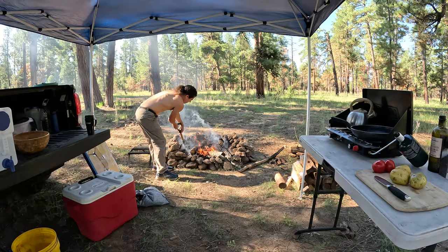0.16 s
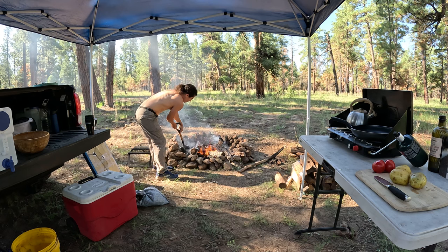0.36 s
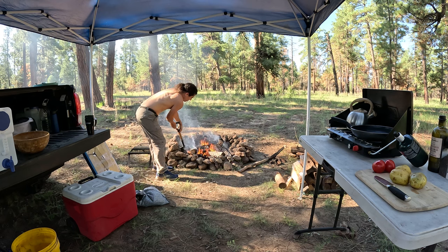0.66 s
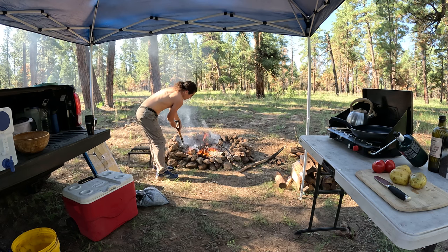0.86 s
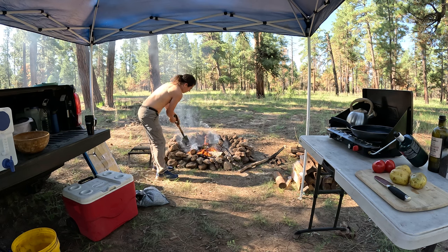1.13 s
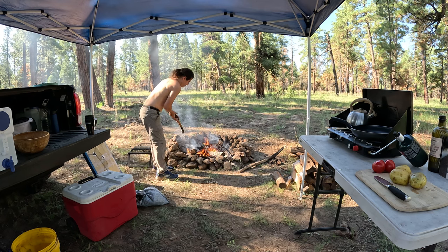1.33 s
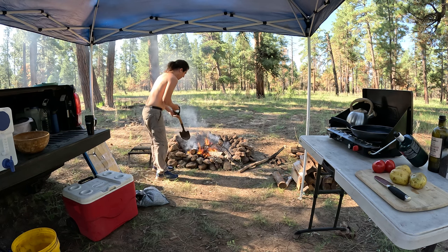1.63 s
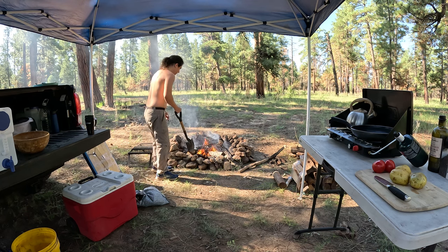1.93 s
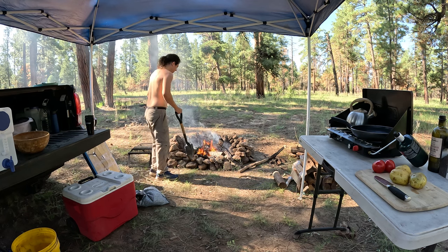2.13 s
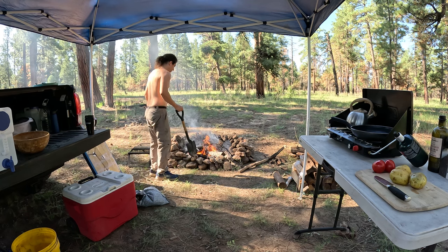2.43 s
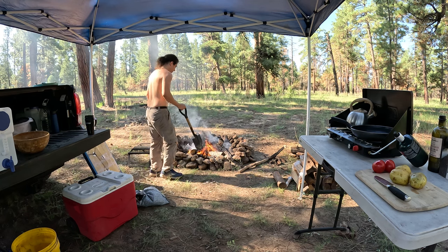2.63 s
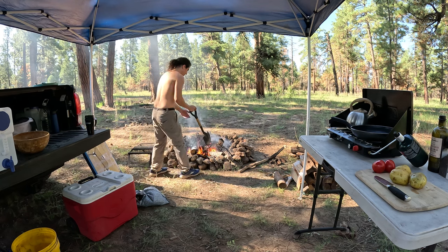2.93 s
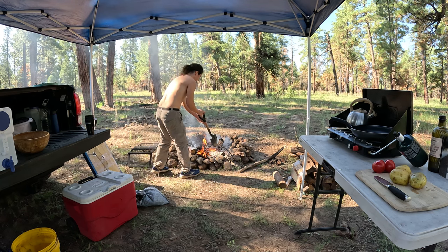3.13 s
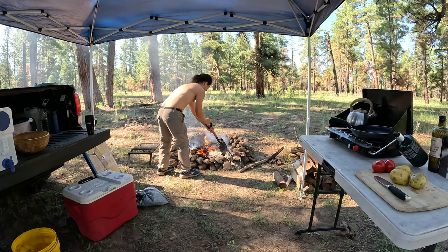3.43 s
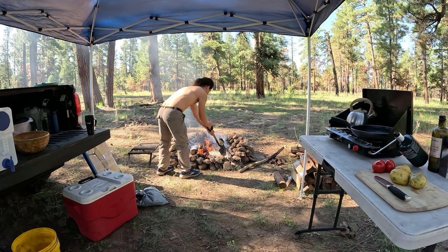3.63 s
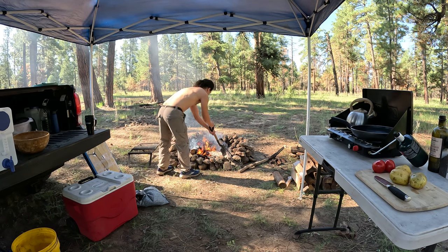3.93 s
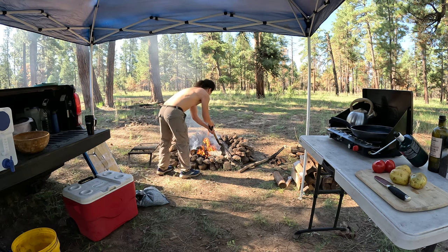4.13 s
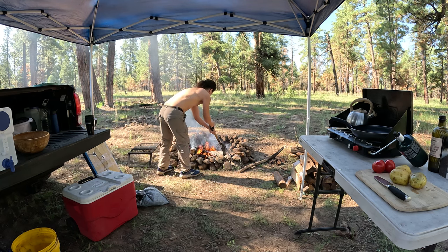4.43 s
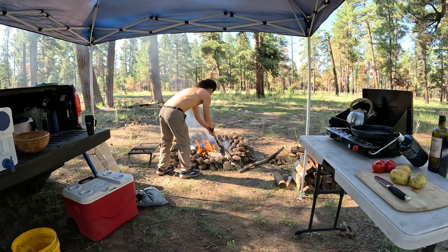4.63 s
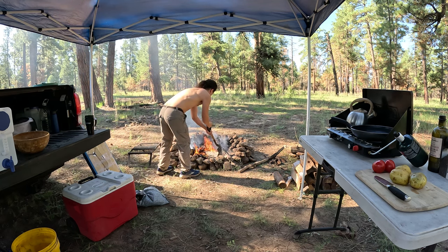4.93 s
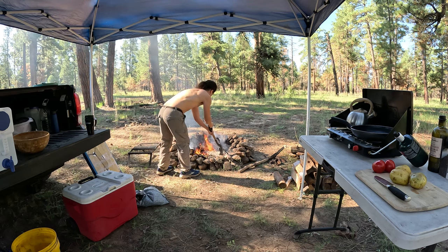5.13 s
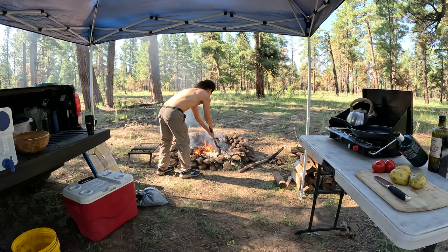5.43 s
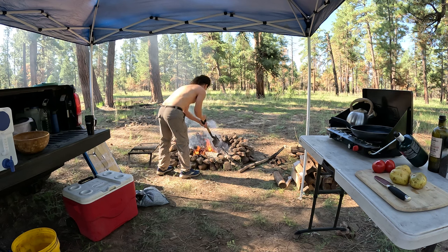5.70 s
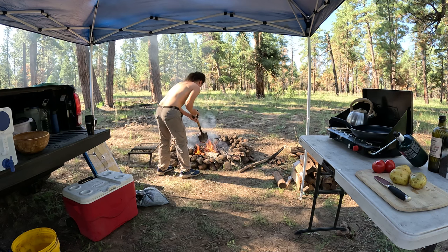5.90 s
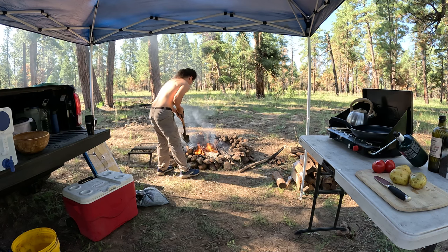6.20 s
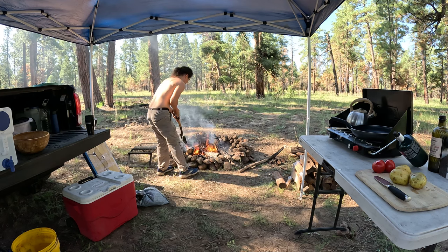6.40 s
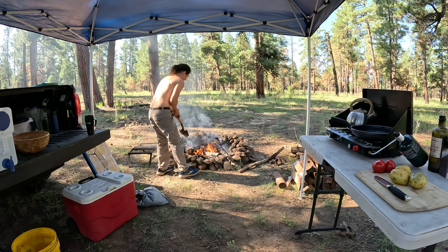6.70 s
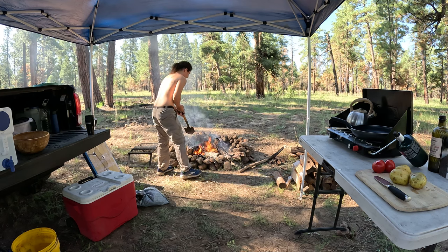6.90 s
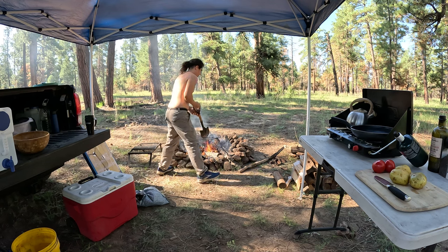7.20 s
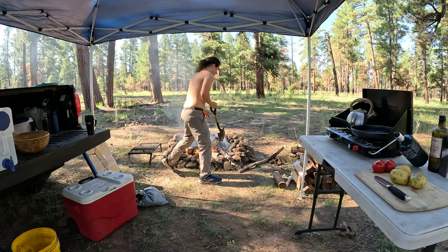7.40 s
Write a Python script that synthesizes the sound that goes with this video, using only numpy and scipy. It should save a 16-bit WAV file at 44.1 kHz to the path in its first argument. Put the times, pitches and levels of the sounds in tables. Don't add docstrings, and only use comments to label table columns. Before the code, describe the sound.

Shovel blade scraping and clacking through stones and embers of a crackling wood fire outdoors, sharp pops, soft flame roar, faint woodland hush.

```python
import sys
import numpy as np
from scipy import signal
from scipy.fft import rfft, irfft
from scipy.io import wavfile
from scipy.ndimage import uniform_filter1d

SR = 44100
rng = np.random.default_rng(int(sys.argv[2]) if len(sys.argv) > 2 else 0)


def invert_db(x):
    u = np.asarray(x, float) / 20
    return 10 ** u


def master_out(mix):
    frames = np.transpose(np.atleast_2d(mix))
    ceiling = np.clip(frames, -1, 1)
    pcm = np.round(ceiling * 32767).astype(np.int16)
    wavfile.write(sys.argv[1], SR, pcm)


N = 332955


def evened(x):
    return x / np.sqrt(np.mean(x ** 2) + 1e-20)


def read(points, hz):
    f, value = np.transpose(points)
    return np.interp(np.log(hz + 1), np.log(f + 1), value)


def curve(rows):
    s, level_db = np.transpose(rows)
    return np.interp(np.arange(N) / SR, s, level_db)


def add(mix, s, sound):
    part = mix[round(s * SR):][:len(sound)]
    part += sound[:len(part)]


def colour(x, points):
    log_gain = np.log(invert_db(read(points, abs(np.fft.fftfreq(4096, 1 / SR)))))
    taps = np.fft.ifft(np.exp(np.conj(signal.hilbert(log_gain)))).real[:2048]
    return signal.oaconvolve(x, taps)[:len(x)]


def resonate(x, hz, width):
    b, a = signal.iirpeak(min(hz, SR / 2.2), hz / max(width, 5), SR)
    return signal.lfilter(b, a, x)


def drift(seconds):
    size = int(seconds * SR)
    smooth = uniform_filter1d(rng.standard_normal(N), size)
    return evened(uniform_filter1d(smooth, size))


def grains(per_s, spread_db):
    rarity = np.minimum(rng.exponential(1, N), 3.3)
    size = invert_db(spread_db * rarity) * rng.standard_normal(N)
    return evened(size * (rng.random(N) < per_s / SR))


def surges(rows):
    clock = np.arange(0, N + 64, 64) / SR
    power = np.zeros(len(clock))
    for s, db, build, die in rows:
        rise = (s - clock) / max(build, .005)
        fall = (clock - s) / max(die, .005)
        power += invert_db(db - 20 * np.maximum(rise, fall)) ** 2
    return np.interp(np.arange(N) / SR, clock, power)


def snaps(rows):
    out, t = np.zeros(N), np.arange(2500) / SR
    for s, db, hz, t60 in rows:
        onset = 1 - np.exp(-t * hz * 1.1)
        add(out, s, invert_db(db + 1.5 - 60 * t / t60) * onset * np.sin(2 * np.pi * hz * t))
    return out


# (f/Hz, level/dB per Hz)
FOREST = [(150, -14), (300, -6.5), (800, -11.5), (1500, -11.5), (3000, -15), (7000, -26), (12000, -52.5)]


def forest():
    return invert_db(-59 + 0.5 * drift(0.3)) * evened(colour(rng.standard_normal(N), FOREST))


# (t/s, level/dB)
GUSTS = [(0.0, -71.5), (0.57, -62.5), (1.28, -71.5), (1.6, -68), (2.21, -66), (2.59, -74.5), (3.15, -69),
         (3.53, -78), (3.83, -64.5), (4.5, -69), (5.07, -64), (5.28, -65), (5.72, -71.5), (6.67, -68.5),
         (7.17, -75.5), (7.55, -76)]
# (f/Hz, level/dB per Hz)
ROAR = [(30, -11.5), (200, 3.5), (330, -0.5), (600, -39.5)]


def flames():
    flutter = 3.2 * drift(0.055)
    return invert_db(curve(GUSTS) + 5.0 + flutter) * evened(colour(rng.standard_normal(N), ROAR))


# (t/s, level/dB)
STIR = [(0.0, -47), (0.38, -48), (0.65, -48), (0.86, -57), (1.34, -76), (2.1, -55), (2.6, -70.5),
        (2.98, -59), (3.64, -63.5), (3.81, -51), (4.08, -62), (4.48, -48), (4.94, -48), (5.49, -45.5),
        (5.89, -70.5), (6.31, -58), (7.22, -63), (7.55, -61)]


def stirring():
    level_db = curve(STIR)
    return level_db, level_db - level_db.mean()


def loose_grit():
    grit = grains(3500, 2.6) + .75 * rng.standard_normal(N)
    return grit * invert_db(2.87 * drift(0.015))


# (f/Hz, level/dB per Hz)
FIZZ = [(2000, -68.5), (5000, -4), (8000, 3.5), (14000, 12.5)]


def scraping_hiss(grit, effort_db):
    buried_db = curve([(3.65, 0), (3.75, 8.5), (5.4, 8.5), (5.492, 0)])
    level_db = -77 + 0.078 * effort_db + buried_db
    return invert_db(level_db + 14.0) * evened(colour(grit, FIZZ))


# (t/s, top level/dB, rise/s per 20 dB, fall/s per 20 dB)
LUMPS = [(0.1, -55.5, -2.5, 0), (0.5, -35, -1.55, -0.92), (2.35, -56, 1.5, 0.5), (2.98, -59.5, -1.4, 0.15),
         (3.64, -40, -0.43, 0), (4.22, -62, 2, .09), (4.35, -42.5, -0.25, -0.05), (5.05, -49.5, 0.7, 0.5),
         (5.44, -47, 0.06, 0.21), (5.49, -59.5, -0.9, 0.0948), (7.37, -55, 1.3, 4)]
# (f/Hz, level/dB per Hz)
DULL = [(150, -30.5), (400, 8), (700, -6.5), (1300, 5), (2200, -20.5), (4000, -14)]


def rolling(effort_db):
    bed_db = -64 + 0.15 * effort_db
    gain = np.sqrt(invert_db(bed_db) ** 2 + surges(LUMPS))
    lumps = grains(900, 3.5) + 0.72 * rng.standard_normal(N)
    return gain * invert_db(-3.5) * evened(colour(lumps, DULL))


# (t/s, top level/dB, rise/s per 20 dB, fall/s per 20 dB)
SLIDES = [(.462, -37, -0.1, -0.15), (.57, -39.5, 0.28, -0.23), (2.88, -58, 0.4, 0.54), (3.4, -60, 0.7, 0.1),
          (4.325, -49.5, -0.07, 0.5), (4.725, -44, -0.08, 0.1), (4.85, -41, 0.02, 0.22),
          (4.893, -45, -0.15, -0.15), (4.92, -42, -0.5, 0.1), (4.975, -47.5, 0.24, 0.38),
          (5.035, -37, 0.01, 0.19), (5.33, -48, -3, 0.45), (7.34, -59, 0.4, 0), (.4, -43.5, -2.1, 0),
          (4.255, -47.5, 0.38, -2.5), (7.44, -45, 0.11, .12)]
# (f/Hz, level/dB per Hz)
GRIT = [(300, -5.5), (900, -17.5), (1700, -0.5), (3200, 1), (5500, -4.5), (8000, -5.5), (12000, -5.5)]


def sliding(grit, level_db):
    gain = np.sqrt(invert_db(level_db - 1.5) ** 2 + surges(SLIDES))
    return gain * evened(colour(grit, GRIT))


# (t/s, peak level/dB, f/Hz, t60/s)
THUDS = [(0.399, -37.5, 227, 0.062), (0.492, -44, 437, 0.084), (0.706, -44.5, 285, 0.052),
         (2.229, -41.5, 632, 0.087), (2.364, -27.5, 187, 0.039), (2.899, -40, 840, 0.15),
         (2.93, -41, 737, 0.48), (2.973, -31, 617, 0.048), (3.204, -33, 190, 0.057),
         (3.306, -31.5, 192, 0.04), (3.63, -39.5, 170, 0.099), (4.71, -42, 480, 0.2),
         (5.033, -41, 548, 0.19), (5.403, -33, 438, 0.055), (5.466, -35.5, 580, 0.053),
         (5.484, -23, 550, 0.034), (7.353, -35, 660, 0.078), (7.37, -31.5, 970, 0.13),
         (7.442, -40, 228, 0.053), (0.993, -46, 196, 0.16), (1.396, -58, 202, 0.079),
         (1.714, -38.5, 172, 0.095), (1.834, -51, 223, 0.1), (2.063, -45, 178, 0.23), (3.76, -45, 215, 0.1),
         (4.785, -44, 232, 0.14), (5.048, -42.5, 194, 0.22), (5.891, -48, 189, 0.081),
         (7.371, -42.5, 178, 0.21), (3.998, -37, 460, 0.036), (0.448, -30, 1040, 0.052),
         (.494, -35, 1050, 0.04), (0.557, -33, 1130, 0.085), (.68, -46, 97, 0.24), (1.83, -53, 90, 0.21),
         (2.091, -47, 97, 0.44), (2.57, -56, 62.3, 0.2), (3.771, -52, 70, .25), (5.87, -53.5, 81, 0.28),
         (7.091, -54, 60, 0.21), (7.241, -55, 70, 0.26), (7.419, -46, 60, 0.22), (5.428, -39.5, 650, 0.16)]


def thuds():
    out, t = np.zeros(N), np.arange(7000) / SR
    onset = 1 - np.exp(-t / 0.0014)
    for s, db, hz, t60 in THUDS:
        tone = min(1, (330 / hz) ** 2) * np.sin(2 * np.pi * hz * t)
        noise = 0.5 * evened(resonate(rng.standard_normal(7000), 1.05 * hz, 0.41 * hz))
        add(out, s, invert_db(db - 3.0 - 60 * t / t60) * onset * (tone + noise))
    return out


# (t/s, peak level/dB, f/Hz, t60/s)
STABS = [(0.4459, -25, 2940, 0.09), (0.4585, -26, 3140, 0.17), (0.492, -28, 2040, 0.13),
         (0.5098, -39, 4500, 0.09), (0.5344, -38, 4370, 0.26), (0.5526, -28, 2600, 0.086),
         (0.692, -40.5, 2310, 0.089), (3.6287, -40, 2280, 0.25), (3.842, -37.5, 1310, 0.055),
         (3.9305, -37.5, 1950, 0.057), (3.953, -35.5, 1340, 0.11), (4.2071, -34.5, 2660, 0.084),
         (4.3706, -29, 2520, 0.029), (4.7162, -39.5, 2840, 0.12), (4.8345, -38, 4240, 0.16),
         (4.8522, -35, 3900, 0.055), (5.02, -33.5, 2330, 0.061), (5.032, -28.5, 2360, 0.055),
         (5.397, -40, 3280, 0.61), (5.4275, -29, 1830, 0.094), (5.437, -26, 3300, 0.13),
         (5.468, -23, 2870, 0.11), (5.485, -37, 1600, 0.023), (5.5907, -40, 1710, 0.11)]
# (t/s, peak level/dB, f/Hz, t60/s)
COALS = [(0.107, -29, 1720, 0.1), (2.2244, -37.5, 1940, 0.099), (2.8369, -34, 1710, 0.22),
         (2.867, -31, 2000, 0.13), (2.8763, -38.5, 2460, 0.16), (2.9, -35, 1900, 0.16),
         (2.9419, -34, 1380, 0.3), (2.9747, -24.5, 1930, 0.04), (3.3672, -38.5, 1320, 0.35),
         (3.3995, -27.5, 2820, 0.061), (3.465, -38.5, 1700, 0.33), (4.4366, -43, 2560, 0.043),
         (4.5082, -32.5, 2610, 0.13), (4.804, -29.5, 3140, 0.059), (4.886, -42.5, 2020, 0.044),
         (7.005, -44, 1860, 0.089), (7.3142, -41, 1830, 0.42), (7.3545, -32, 2440, 0.069),
         (7.3701, -43, 1530, 0.067), (7.449, -37.5, 2820, 0.32)]


def knocks():
    spray, push, t = np.zeros(N), np.zeros(N), np.arange(7000) / SR
    # share of grit and steel in a blow, dB
    rows = [(*r, -10.5) for r in STABS] + [(*r, -34.5) for r in COALS]
    for s, db, hz, t60, grit_db in rows:
        chance, clumps = rng.standard_normal((2, 7000))
        shape = invert_db(-60 * t / t60) * (1 - np.exp(-t / 0.001))
        rattle = chance * abs(chance) * invert_db(2.3 * evened(uniform_filter1d(clumps, 90)))
        rattle = evened(rattle)
        rattle[40] += 4
        body = evened(resonate(resonate(rattle, hz, 0.59 * hz), hz, 2.7 * hz))
        body += invert_db(grit_db + 17.5) * evened(colour(rattle, GRIT))
        add(spray, s, invert_db(db - 12) * shape * body)
        add(push, s, invert_db(db + grit_db + 5.0) * shape * rattle)
    return spray, push


# (t/s, peak level/dB, f/Hz, t60/s)
CLACKS = [(0.1066, -25, 1720, 0.032), (0.4482, -24, 2900, .006), (0.4592, -17, 3220, 0.004),
          (0.4588, -24, 1990, 0.013), (.513, -40, 4600, 0.04), (0.555, -32, 2710, .025),
          (2.379, -37, 5000, .008), (2.9752, -28, 1900, .004), (3.404, -31, 3180, 0.011),
          (3.405, -34.5, 1750, 0.025), (3.466, -37.5, 1640, 0.053), (4.368, -44.5, 2625, 0.049),
          (5.4685, -28, 4950, 0.0071), (5.4712, -13, 3130, .004), (5.4865, -18, 1900, 0.0035),
          (5.657, -30, 2550, .006)]


def clacks():
    return snaps(CLACKS)


# (f/Hz, bandwidth/Hz, level/dB)
BLADE = [(1498, 45, -6), (1849, 24, -7), (2264, 20, -2), (2470, 25, -6), (2649, 20, -9), (3118, 22, 2),
         (3495, 26, -1), (3760, 20, -9), (4583, 11, -7), (4856, 30, -7), (5068, 11, -6), (5833, 10, -9),
         (6970, 14, -13), (7246, 30, -11)]


def lifted_blade(push):
    clock, out = np.arange(N) / SR, np.zeros(N)
    push = push * (clock > 5.39) * (clock < 5.56)
    for hz, width, db in BLADE:
        narrowness = np.sqrt(SR / (np.pi * width))
        out += invert_db(db - 2) * resonate(push, hz, .8 * width) * narrowness
    return out


# (f/Hz, level/dB)
DRAGGED = [(1770, -2), (2140, -3), (2420, -3), (2710, -4), (3050, -8), (3360, -4), (3720, -4), (4490, -6),
           (4640, 0), (5080, -9), (5620, -6), (6430, -4), (6920, -10), (7950, -8)]


def scraped_blade(rustle):
    out = np.zeros(N)
    force = rustle * (np.arange(N) / SR < .3)
    width = 18
    for hz, db in DRAGGED:
        out += invert_db(db - 19) * resonate(force, hz, width) * np.sqrt(SR / (np.pi * width))
    return out


# (f/Hz, level/dB)
PRESSED = [(1330, -2), (2250, -3), (2476, -9), (2690, -3), (2880, -6), (3470, -9), (3860, -6), (4590, -5),
           (5500, -5), (6430, -2), (7360, -10), (7950, -14), (11200, -8)]
# (f/Hz, level/dB)
WEDGED = [(1270, -2), (2196, -9), (2724, -2), (3192, -10), (3811, -14), (4670, -5), (5550, -14),
          (6110, -14), (6530, -13), (7962, -14)]
# (t/s, level/dB, held/s, favoured f/Hz)
PRESSES = [
    (3.632, -49, .045, 4500),
    (3.932, -54, .036, 6600),
    (3.952, -49, .012, 2500),
    (4.012, -61, .03, 7000),
]
# (t/s, level/dB, held/s, favoured f/Hz)
WEDGES = [
    (4.21, -42, .016, 2700),
]
# (t/s, level/dB, held/s, favoured f/Hz)
DRAGS = [(.014, -49, .105, 4570), (.045, -53, .07, 2600), (.035, -48, .155, 2140), (.112, -54, .04, 1790),
         (.02, -56, .06, 2400), (.185, -52, .07, 3750), (.03, -55, .2, 3700), (.178, -52, .022, 6400),
         (.172, -54, .03, 9500), (.205, -51, .06, 4640), (.228, -50, .062, 2420), (.24, -53, .015, 3700),
         (5.588, -46, .022, 3375), (5.58, -48, .04, 1770), (5.56, -50, .08, 5620), (5.585, -50, .065, 6920),
         (5.52, -53, .1, 4600)]


def rubbed_blade():
    out, t = np.zeros(N), np.arange(9000) / SR
    # fall of the modes away from the favoured pitch, dB per octave
    for rubs, modes, slope_db in ((PRESSES, PRESSED, 4), (WEDGES, WEDGED, 0), (DRAGS, DRAGGED, 36)):
        for s, db, held, favoured in rubs:
            attack = np.minimum(t / (.003 + .12 * held), 1)
            for hz, mode_db in modes:
                peak_db = db + mode_db - slope_db * abs(np.log2(hz / favoured))
                t60 = np.clip(0.09 * np.sqrt(3000 / hz), .05, .09)
                decay_db = 60 * np.maximum(t - held, 0) / t60 + 22 * t
                noise = evened(resonate(rng.standard_normal(9000), hz, 30))
                tone = 1.3 * np.sin(2 * np.pi * hz * t) + 0.35 * noise
                add(out, s, invert_db(peak_db - 1.5 - decay_db) * attack * tone)
    return out


# (t/s, peak level/dB, f/Hz)
CHIPS = [(.7825, -41, 2100), (0.7856, -29, 5450), (1.026, -41, 5500), (1.05, -44, 5140),
         (1.051, -28.5, 11200), (1.121, -55, 6700), (1.171, -49, 6800), (1.291, -50, 5060),
         (1.305, -52, 4240), (1.35, -48, 6270), (1.442, -46, 6800), (1.478, -37, 6400),
         (1.561, -37.5, 3430), (2.583, -28, 5900), (2.649, -41, 2100), (2.819, -32.5, 6100),
         (2.851, -36, 3870), (2.858, -44, 7400), (2.881, -33, 3900), (2.904, -42, 4300),
         (2.976, -28.5, 3600), (3.27, -34, 5830), (3.341, -44, 7500), (3.512, -35.5, 6600),
         (3.752, -38.5, 2690), (3.816, -52, 4660), (3.998, -43, 7500), (4.1095, -31, 6360),
         (4.137, -38, 6200), (4.165, -48, 3200), (4.255, -43, 4570), (4.314, -40, 3800),
         (4.48, -33.5, 4030), (4.58, -34.5, 4270), (5.224, -32, 2800), (5.658, -33, 2730),
         (5.712, -42, 4160), (5.805, -45, 7060), (5.9165, -33, 3350), (5.979, -40, 3770),
         (6.038, -43.5, 2640), (6.04, -44, 4100), (6.078, -40.5, 2750), (6.157, -51, 2760),
         (6.266, -42, 3940), (6.432, -40, 3730), (6.684, -24.5, 6130), (6.7435, -45, 5000),
         (6.881, -35.5, 4630), (6.927, -43, 3630), (6.937, -35, 11000), (7.004, -45, 2820),
         (7.005, -44, 1810), (7.027, -40, 3420), (7.027, -42, 1690), (7.149, -31, 5700), (7.243, -38, 3940),
         (7.269, -52, 5100)]


def chips():
    return snaps([(s, db, hz, 21 / hz) for s, db, hz in CHIPS])


# (t/s, peak level/dB, crack f/Hz, sharp edge level/dB)
POPS = [(0.34, -9.5, 5300, -11), (0.7825, -33, 5260, -13), (1.026, -41, 5100, 10), (1.0517, -36, 5740, 3),
        (1.478, -34, 6850, -19.5), (1.5604, -42, 3330, -16), (1.946, -22, 5770, -6),
        (2.364, -6.5, 4300, 15.5), (2.5817, -24, 5900, -14), (2.6486, -33.5, 2370, -8),
        (2.817, -22.5, 6600, 2), (3.269, -29.5, 4600, -20), (3.5106, -35.5, 2850, 17),
        (3.752, -37, 2600, -13), (3.816, -36.5, 3200, -8), (3.9964, -32.5, 2430, 17),
        (4.1089, -26.5, 5460, -25), (4.135, -42, 3040, 12), (4.35, -15, 4760, 6),
        (4.4823, -30.5, 2700, -10), (4.58, -33, 4300, -6), (4.6772, -30, 3600, -12),
        (5.2128, -32, 2650, -25), (5.224, -33.5, 2970, -13), (5.916, -49.5, 2930, -30),
        (6.0775, -39, 2670, 18), (6.742, -36.5, 2260, -3), (6.9366, -37, 2380, 9),
        (7.1484, -32.5, 5340, -16), (7.446, -30, 2800, 0), (2.975, -41, 1830, -19)]
# (t/s, peak level/dB, crack f/Hz, sharp edge level/dB, ground path level/dB)
SPLITS = [
    (3.2051, -21.5, 3740, -2.5, -5),
    (5.6564, -34, 2550, 6, -1),
    (5.8686, -29, 3800, -20, -5.5),
    (6.3618, -15.5, 5100, -26, -8),
    (6.6821, -22.5, 6430, -8, -8),
    (6.8805, -31, 4520, -3, -5),
]
# (t/s, peak level/dB)
TICKS = [(0.683, -44), (0.7756, -27), (1.123, -36), (1.1725, -34.5), (1.29, -43), (1.3053, -36),
         (1.3503, -34), (1.4655, -39), (2.0378, -40), (2.151, -34), (2.8559, -43), (3.342, -37),
         (4.012, -23.5), (4.5976, -27.5), (4.7885, -38), (5.7154, -35), (5.8062, -35), (5.979, -32),
         (6.0385, -30.5), (6.1373, -35), (6.158, -30.5), (6.195, -30.5), (6.2456, -31.5), (6.2644, -27),
         (6.4324, -27), (6.452, -31), (6.471, -31), (6.496, -37), (7.244, -33), (7.47, -29), (0.973, -40),
         (1.444, -41), (1.744, -43), (2.084, -56), (2.446, -36), (2.524, -40), (5.8545, -38), (6.114, -38),
         (6.2346, -38), (6.332, -49), (6.6576, -41), (6.7728, -44), (6.849, -47), (7.272, -49)]
# (f/Hz, level/dB)
CRACK = [(300, -45.5), (1100, -4), (1900, 3), (16000, 11)]
# (f/Hz, level/dB)
RIM = [(5000, 3.5), (12000, 1)]


def pops():
    ground, canopy, t = np.zeros(N), np.zeros(N), np.arange(600) / SR
    # ground path in dB, and how long the wood keeps tearing in ms
    rows = [(*r, -5.5, 1) for r in POPS] + [(*r, 2.29) for r in SPLITS]
    rows += [(s - .002, db - 5.0, 7000, -3, -7, 0.98) for s, db in TICKS]
    for s, db, hz, edge_db, ground_db, tear_ms in rows:
        tear = 0.095 * tear_ms * rng.standard_normal(600) * np.exp(-(t * 1000 / tear_ms) ** 2)
        tear[0] = -1
        lines = rfft(tear)
        tear = irfft(lines / uniform_filter1d(abs(lines), size=5), 600)
        tear *= np.exp(-(t * 600 / tear_ms) ** 2)
        tear /= abs(tear).max()
        u = t[:80] * hz * 6.67
        swing = np.convolve(tear, u * (2 - u) * np.exp(-u))[:600]
        swing /= abs(swing).max()
        edge = invert_db(edge_db) * np.diff(tear, 2, prepend=[0, 0])
        add(ground, s + .001, invert_db(db + ground_db) * (swing - .05 * edge))
        add(canopy, s + .001, invert_db(db - 5.5) * (swing - .33 * edge))
    faint = invert_db(-92.0) * np.diff(grains(70, 1.1), prepend=0)
    ground = colour(colour(ground + 2.2 * faint, CRACK), RIM)
    return ground, colour(canopy + faint, CRACK)


# (delay/ms, level/dB)
PATHS = [(2.3, -11), (2.75, 0), (3.15, -5), (3.4, -8), (6.6, -15), (9.5, -24), (14.6, -22), (15.3, -22),
         (26, -28)]
# (f/Hz, t60/s)
TREES = [(300, 0.29), (2000, 0.29), (6000, 0.11), (12000, 0.019)]
# (f/Hz, level/dB)
ECHOED = [(500, 0), (2500, -5), (5000, 0)]


def around(ground, canopy):
    early = np.zeros(1400)
    for ms, db in PATHS:
        early[round(ms * SR / 1000)] = invert_db(db)
    taps = np.zeros(SR // 2)
    at = np.arange(180, len(taps) - 20, 20)
    taps[at + rng.integers(0, 20, len(at))] = rng.choice([-1., 1.], len(at))
    hz, t, z = signal.stft(taps, SR, nperseg=128)
    decay_db = read(ECHOED, hz)[:, None] - 60 * t / read(TREES, hz)[:, None]
    tail = signal.istft(z * invert_db(decay_db), SR, nperseg=128)[1]
    tail *= invert_db(-18.5) / np.linalg.norm(tail)
    reflected = signal.oaconvolve(canopy, early)[:N]
    scattered = signal.oaconvolve(ground + canopy, tail)[:N]
    return ground + reflected + scattered


def scene():
    level_db, effort_db = stirring()
    grit = loose_grit()
    rustle = sliding(grit, level_db) + scraping_hiss(grit, effort_db)
    bed = rustle + rolling(effort_db)
    spray, push = knocks()
    spray = spray + thuds()
    steel = lifted_blade(push) + scraped_blade(rustle) + rubbed_blade()
    contact, chip = clacks(), chips()
    ground, canopy = pops()
    ground = ground + 0.83 * chip + contact + spray + 0.83 * steel + bed
    canopy = canopy + chip + .5 * contact + 0.5 * spray + 0.094 * steel + 0.043 * bed
    mono = around(ground, canopy) + flames() + forest()
    return np.array([mono, mono])


# (f/Hz, level/dB)
MIC = [(30, -22), (100, -14.5), (170, 1.5), (260, -6.5), (600, 3), (950, -1), (1500, 1), (6500, 0.5),
       (8200, -9), (9600, -9.5), (10700, -2.5), (12900, -17.5), (13800, -30.5), (15500, -37)]


def housing(x):
    b, a = signal.iirnotch(9050, 9050 / 380, SR)
    return signal.lfilter(b, a, colour(x, MIC))


# (f/Hz, phase/rad)
PORTS = [(0, 0.04), (10800, 0.016), (12000, 0.8), (12600, 0.73), (13700, 0.025)]
# (f/Hz, level/dB)
APART = [(30, -18), (200, -45), (600, -38.5), (2000, -49), (6000, -30), (11000, -20), (14000, -7.5)]


def two_ports(mid):
    hz = np.fft.rfftfreq(N, 1 / SR)
    scatter = rfft(rng.standard_normal(900) / 30, N)
    lead = np.exp(.5j * read(PORTS, hz))
    unlike = invert_db(read(APART, hz)) * scatter
    spectrum = rfft(mid)
    left = irfft(spectrum * (lead + unlike), N)
    right = irfft(spectrum * (1 / lead - unlike), N)
    return np.array([left, right])


def low_pass(x):
    return signal.sosfilt(signal.butter(12, 14140, fs=SR, output="sos"), x)


def record(dry):
    mix = two_ports(housing(dry[0]))
    return low_pass(mix)


dry = scene()
out = record(dry)
master_out(out)
```